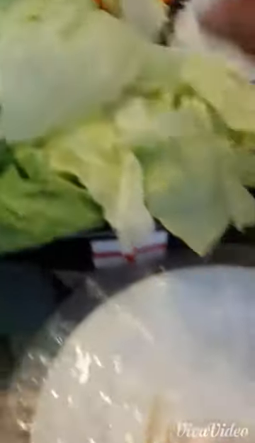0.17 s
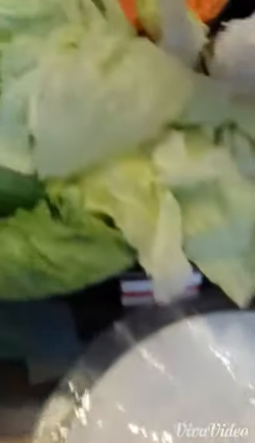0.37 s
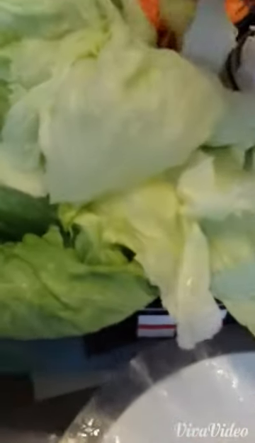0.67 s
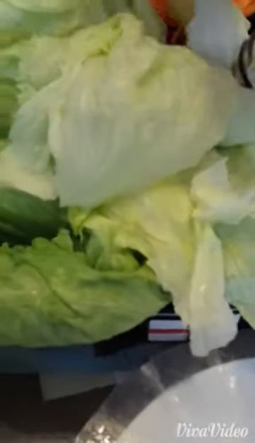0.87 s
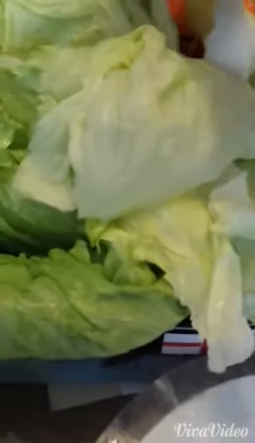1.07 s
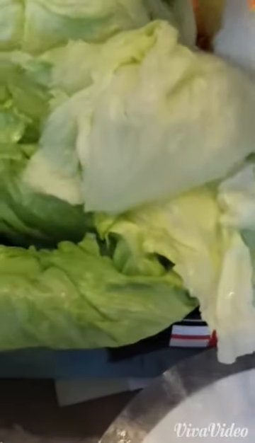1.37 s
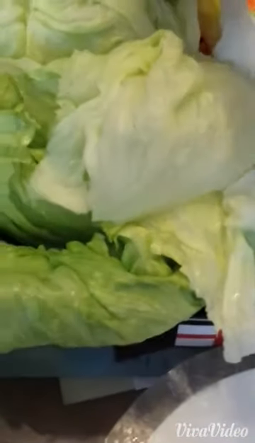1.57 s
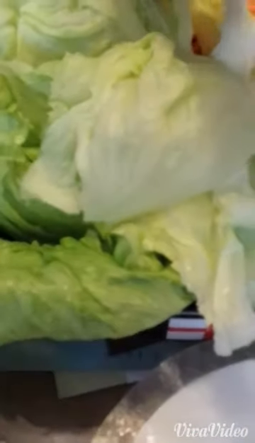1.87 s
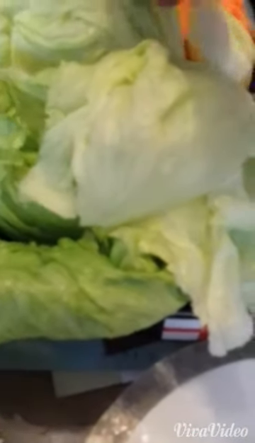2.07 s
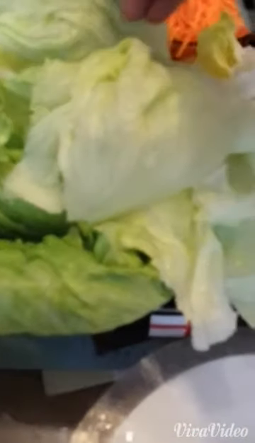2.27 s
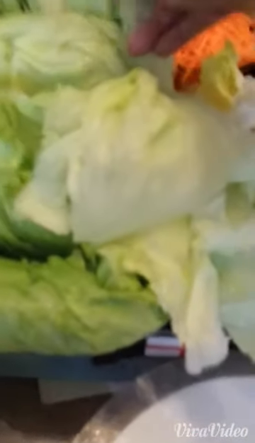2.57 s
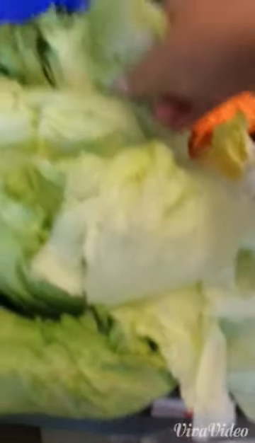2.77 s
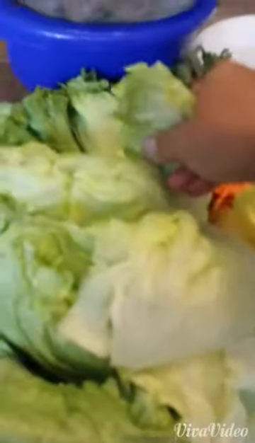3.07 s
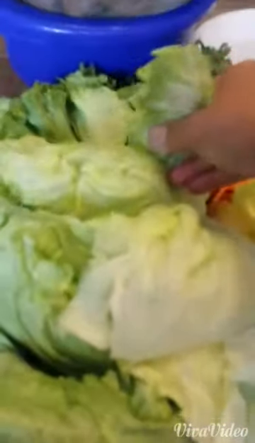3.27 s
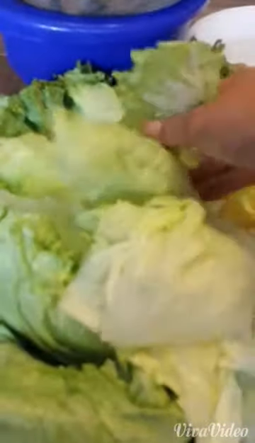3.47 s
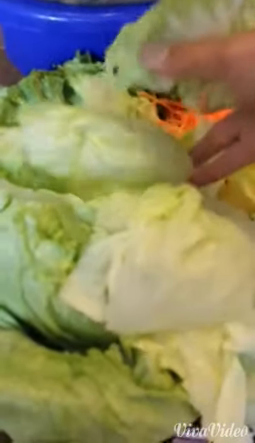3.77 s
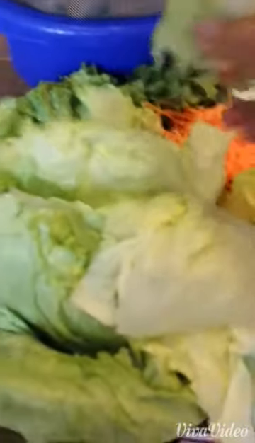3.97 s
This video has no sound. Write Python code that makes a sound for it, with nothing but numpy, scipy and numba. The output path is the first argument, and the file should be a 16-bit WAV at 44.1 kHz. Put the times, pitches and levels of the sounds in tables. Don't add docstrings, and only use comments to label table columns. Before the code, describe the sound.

Close, stereo crackle of lettuce being torn: quiet rustling builds into sharp rib snaps and one heavy crunch, then dies away.

```python
import sys
import numpy as np
from scipy import signal
from scipy.fft import rfft, irfft
from scipy.io import wavfile
from scipy.ndimage import uniform_filter1d
from numba import njit

SR = 44100
rng = np.random.default_rng(int(sys.argv[2]) if len(sys.argv) > 2 else 0)


def volts_from_decibels(level):
    exponent = np.asarray(level, float) / 20
    return 10 ** exponent


def inscribe(sig):
    pcm = np.round(np.clip(np.atleast_2d(sig).T, -1, 1) * 32767)
    wavfile.write(sys.argv[1], SR, pcm.astype(np.int16))


N = 182088


def unit(x):
    return x / np.sqrt(np.mean(x ** 2))


def follow(start_s, values):
    return np.interp(np.arange(N) / SR, start_s, values)


def event_columns(table):
    return np.transpose(table)[:, :, None]


def colour(x, points):
    hz, db = np.transpose(points)
    bins = np.arange(N // 2 + 1) * SR / N + 1
    curve_db = np.interp(np.log(bins), np.log(hz), db)
    return irfft(rfft(x) * volts_from_decibels(curve_db), N)


def pair(points, alike_hz):
    mid, left, right = rng.standard_normal((3, N))
    bins = np.arange(N // 2 + 1) * SR / N
    alike = .92 / (1 + (bins / alike_hz) ** 4)
    shared = np.sqrt(alike) * rfft(mid)
    apart = np.sqrt(1 - alike) * rfft(np.array([left, right]))
    return unit(colour(irfft(shared + apart, N), points))


def gesture(start_s, peak_db, swell_s, fade_s, rest_db):
    t = np.arange(0, N + 64, 64)[:, None] / SR
    before = (start_s - t) / np.maximum(swell_s, .01)
    after = (t - start_s) / np.maximum(fade_s, .01)
    db = peak_db - 20 * np.where(t < start_s, before, after)
    power = np.sum(volts_from_decibels(db) ** 2, axis=1) + volts_from_decibels(rest_db) ** 2
    return follow(t[:, 0], 10 * np.log10(power))


@njit
def rings(start, hz, cycles, size, rise):
    out = np.zeros(N)
    for k in range(len(start)):
        turn = np.exp((2j * np.pi - 1 / cycles[k]) * hz[k] / SR)
        soften = np.exp(-hz[k] / (rise * SR))
        z, soft, first = size[k] + 0j, 1., start[k]
        for j in range(first, min(N, first + int(6 * cycles[k] * SR / hz[k]))):
            out[j] += z.imag * (1 - soft)
            z *= turn
            soft *= soften
    return out


# start_s [s], lag_share [share of port lag, 0-1.5]
HAND_BEARING = [
    (.7, 1.14),
    (2.2, .9),
    (2.8, .55),
    (4.13, 0.49),
]


def heard(s, hz, cycles, db, pan_db, lag_s, detune, rise=0.34):
    spread = np.broadcast_arrays(s, hz, cycles, db, pan_db, lag_s, detune)
    s, hz, cycles, db, pan_db, lag_s, detune = map(np.ravel, spread)
    lag_s = lag_s * np.interp(s, *np.transpose(HAND_BEARING))
    cycles, rise = np.maximum(cycles, .3), max(1. * rise, .05)

    def at(t):
        return np.clip(t * SR, 0, N - 1).astype(np.int64)

    left_hz, right_hz = np.clip(hz * detune, 60, .3 * SR), np.clip(hz, 60, .3 * SR)
    left = rings(at(s + lag_s), left_hz, cycles, volts_from_decibels(db + pan_db / 2), rise)
    right = rings(at(s), right_hz, cycles, volts_from_decibels(db - pan_db / 2), rise)
    return np.array([left, right])


# pitch_hz [Hz], level_db [dB per Hz]
AIR_SPECTRUM = [(15, -29), (27, -10), (41, 8), (55, -14), (99, -26), (1120, -21), (1570, -22), (8460, -23),
                (10700, -13.5), (12200, -18), (15800, -54), (22000, -120)]


def air():
    return volts_from_decibels(-75.0) * pair(AIR_SPECTRUM, 730.0)


# start_s [s], rumble_db [dB]
GRIP_RUMBLE = [
    (0.0, -70),
    (0.54, -69),
    (0.62, -66),
    (0.78, -60),
    (0.87, -73),
    (3.72, -66),
    (4.13, -67),
]


def grip():
    tremor = pair([(28, -24), (42, -10.0), (70, -17.5), (140, -57.0)], 200.)
    return volts_from_decibels(follow(*np.transpose(GRIP_RUMBLE)) + 4.0) * tremor


def kitchen(x):
    t60_s, onset_s, level_db = 0.11, 0.00072, -8
    t = np.arange(SR // 2) / SR
    tail = rng.standard_normal((2, len(t))) * volts_from_decibels(-60 * t / t60_s) * (1 - np.exp(-t / onset_s))
    tail = tail / np.sqrt(np.sum(tail ** 2, axis=1, keepdims=True))
    return volts_from_decibels(level_db) * signal.fftconvolve(x, tail, axes=1)[:, :N]


# pitch_hz [Hz], level_db [dB per Hz]
TABLE_SPECTRUM = [(41, -59), (70, 2), (170, -3.5), (275, 3), (363, -1), (402, -1), (530, -1), (774, -7.5),
                  (1000, -14.5), (1300, -24), (2200, -120)]


def table_rumble(rumble_db):
    jolts = volts_from_decibels(1.6 * unit(uniform_filter1d(rng.standard_normal(N), size=900)))
    return volts_from_decibels(rumble_db + 2.5) * unit(jolts * pair(TABLE_SPECTRUM, 670.0))


def flesh_rub(rub_db):
    return volts_from_decibels(rub_db - 2.0) * crinkle(np.full(N, 1709.0), 0.553, 2.2, 1.8, -2.5, count=12000)


# start_s [s], rumble_db [dB], rub_db [dB], fade_s [s per 20 dB]
HEAP_PRESSES = [(0.0, -57.5, -58, 0.23), (.2, -62, -65.5, 0.6), (.48, -60, -63.5, .5),
                (.62, -57, -70, 0.29), (.72, -61, -58.5, 0.16), (1.076, -62, -62.5, 0.12),
                (1.135, -60, -63, 0.08), (1.3, -61.5, -61, 0.3), (1.556, -64.5, -67.5, 0.33),
                (1.7, -61.5, -62.5, 0.23), (1.882, -59.5, -63.5, 0.23), (2.092, -55.5, -53, 0.12),
                (2.159, -55.5, -48, 0.1), (2.28, -56.5, -73, 0.55), (2.469, -56, -53.5, 0.13),
                (2.68, -53.5, -50.5, 0.05), (2.74, -57, -51, 0.15), (2.88, -61.5, -73, 1),
                (2.97, -65, -67, 0.65), (3.12, -61.5, -55.5, 0.3), (3.27, -61, -52, 0.2),
                (3.386, -43, -33.5, 0.0435), (3.448, -51.5, -49.5, 0.32), (3.62, -62, -57, 0.14),
                (3.7, -50, -48.5, 0.16), (3.78, -53, -53, 0.11), (3.88, -62, -64, .1), (3.97, -70, -76, .3),
                (4.05, -66, -65, .09), (4.11, -66, -64, 0.15)]


def presses():
    start_s, rumble_db, rub_db, fade_s = np.transpose(HEAP_PRESSES)
    swell_s = 0.69 * fade_s
    rumble_db = gesture(start_s, rumble_db, swell_s, fade_s, rest_db=-94)
    rub_db = gesture(start_s, rub_db, swell_s, fade_s, rest_db=-90)
    return table_rumble(rumble_db), flesh_rub(rub_db)


# start_s [s], peak_db [dB], pitch_hz [Hz]
TABLE_THUDS = [(0.137, -43, 395), (0.289, -58, 257), (0.481, -50, 454), (0.694, -44.5, 432),
               (0.744, -51, 271), (1.122, -56.5, 260), (1.483, -59, 455), (1.525, -58.5, 433),
               (1.559, -50, 440), (1.684, -52, 420), (1.858, -58, 417), (2.072, -53, 504), (2.13, -32, 558),
               (2.197, -45, 450), (2.426, -41.5, 420), (2.471, -44.5, 440), (2.659, -52, 620),
               (2.844, -52, 517), (3.17, -51, 400), (3.25, -47.5, 446), (3.384, -32.5, 427),
               (3.397, -37.5, 288), (3.699, -45.5, 250), (2.947, -47, 500), (3.05, -52, 480)]


def thuds():
    s, peak_db, hz = np.transpose(TABLE_THUDS)
    main_mode = heard(s, hz, 3.1, peak_db + 4.5, 0.5, 0.00016, 0.96, rise=0.27)
    return main_mode + heard(s, 0.75 * hz, 6.5, peak_db - 7.0, -0.36, -0.00014, 0.97, rise=0.2)


# start_s [s], peak_db [dB], pitch_hz [Hz]
TABLE_RINGS = [(2.289, -46, 420), (2.632, -54, 455), (2.668, -51, 457), (3.39, -37.5, 331),
               (3.405, -40.5, 428), (2.7215, -40.5, 453), (2.745, -52, 560), (2.779, -48, 432),
               (2.781, -51, 634), (2.698, -55, 645), (4.032, -60.5, 1250), (4.098, -62, 1860)]


def hums():
    s, peak_db, hz = np.transpose(TABLE_RINGS)
    return heard(s, hz, 4.8, peak_db + 6.5, 0.4, 0.0001, 0.99, rise=1.5)


# start_s [s], peak_db [dB], pitch_hz [Hz]
THIN_STALKS = [(1.448, -60, 1560), (2.108, -43, 1170), (2.44, -41, 1110), (2.465, -45, 1110),
               (2.499, -45.5, 1190), (2.677, -54, 825), (2.962, -43, 921), (3.016, -48, 1100),
               (3.221, -45, 1150), (3.34, -45, 1100), (3.408, -30, 1080), (3.557, -42, 1120),
               (3.646, -46, 1130), (3.69, -41, 1130), (3.7, -41.5, 1050)]


def plips():
    s, peak_db, hz = np.transpose(THIN_STALKS)
    return heard(s, hz, 2.04, peak_db + 1.5, -6.5, 0.0002, 1.04)


# start_s [s], peak_db [dB], pitch_hz [Hz]
STALK_KNOCKS = [(0.5985, -49, 3000), (0.6948, -47, 3250), (1.2566, -53, 3090), (1.4476, -52, 2620),
                (1.9973, -42.5, 2700), (2.0844, -43, 3140), (2.1635, -29, 3000), (2.2214, -25, 3170),
                (2.2464, -41, 2880), (2.3615, -36, 3330), (2.4392, -41, 3440), (2.4982, -48, 3490),
                (2.6844, -48, 1840), (2.9564, -32.5, 2130), (2.9614, -37, 3250), (3.1454, -46, 2030),
                (3.1542, -41.5, 2110), (3.1993, -41, 2270), (3.3784, -20.5, 3220), (3.5074, -45, 3300),
                (3.5897, -34.5, 2400), (3.7864, -47, 2270), (4.0806, -55, 1860)]


def knocks():
    s, peak_db, hz = np.transpose(STALK_KNOCKS)
    return heard(s, hz, 2.5, peak_db + 5.0, -6.0, 0.00018, 0.84)


# start_s [s], peak_db [dB], pitch_hz [Hz]
THICK_STALKS = [(1.128, -57, 1000), (1.692, -48, 1060), (2.103, -46, 1330), (2.128, -34, 1120),
                (2.222, -38.5, 977), (2.315, -41.5, 1130), (2.363, -42, 1000), (2.429, -37.5, 1040),
                (2.66, -49, 800), (2.732, -37, 1115), (2.848, -41.5, 960), (2.881, -43.5, 1020),
                (2.947, -33, 1104), (3, -39, 1210), (3.06, -37, 1254), (3.185, -44, 1020),
                (3.209, -35, 2170), (3.236, -41, 1010), (3.293, -45, 1180), (3.314, -38.5, 1230),
                (3.36, -36, 2140), (3.381, -24, 1088), (3.59, -40, 915), (3.669, -41.5, 1150),
                (3.682, -38, 1080), (3.79, -42.5, 1370)]


def pops(count=4):
    s, peak_db, hz = event_columns(THICK_STALKS)
    chance = rng.standard_normal((len(s), count))
    hollow = heard(s, hz, 2.26, peak_db + 4.0, -6.5, 0.00019, 1.0)
    later_s = 0.00185 * rng.random((len(s), count))
    click_hz = 1.608 * hz * np.exp(0.434 * chance)
    return hollow + heard(s + later_s, click_hz, 2.46, peak_db - 0.5, -3.5, 0.00034, 0.877)


# pitch_hz [Hz], level_db [dB per Hz]
SLIDE_SPECTRUM = [(2300, -30), (2900, -1.5), (3500, -23), (4500, -16), (5200, 4), (5600, -17), (6050, -7),
                  (6700, -20), (7700, -12), (9500, -17)]


def slide():
    slide_db = gesture(0.596, -51, swell_s=0.12, fade_s=0.12, rest_db=-100)
    return volts_from_decibels(slide_db) * pair(SLIDE_SPECTRUM, 730.0)


def crinkle(centre_hz, spread, cycles, scatter_db, pan_db, count):
    s = rng.random(count) * N / SR
    chance = rng.standard_normal((4, count))
    hz = centre_hz[(s * SR).astype(int)] * np.exp(spread * chance[0])
    db = scatter_db * np.minimum(rng.exponential(size=count), 4)
    lag_s = 0.00033 + 0.6e-4 * chance[1]
    detune = np.exp(0.16 * chance[3])
    return unit(heard(s, hz, cycles, db, pan_db + 9.5 * chance[2], lag_s, detune))


# start_s [s], crinkle_db [dB], swell_s [s per 20 dB], fade_s [s per 20 dB]
LEAF_SQUEEZES = [(0.0, -65.5, .1, 0.5), (.35, -61.5, 0.6, 0.72), (.6, -50.5, 0.11, 0.13),
                 (.72, -60, 0.33, 0.09), (1.06, -66, 0.04, .5), (1.33, -63.5, 0.18, 0.24),
                 (1.558, -57, 0.06, 0), (1.598, -62, 0.05, 0.03), (1.701, -51, 0.05, 0.07),
                 (1.77, -67.5, 0.3, 0.3), (1.87, -61.5, 0.02, 0.5), (1.925, -55, 0.03, .04),
                 (2.156, -38.5, 0.09, 0.09), (2.301, -39.5, 0.21, 0.22), (2.52, -55.5, -0.05, .4),
                 (2.73, -50, 0.05, .4), (2.889, -43, 0.05, 0.09), (2.968, -40.5, 0, 0.17),
                 (3.03, -48.5, 0.04, 0.07), (3.16, -48.5, -0.07, 0.24), (3.27, -47, 0.11, 0.3),
                 (3.369, -28, 0.0153, 0.0332), (3.384, -25.5, 0.0158, 0.1124), (3.448, -43, -0.4, 0.2655),
                 (3.565, -43, -0.07, 0.11), (3.616, -39, 0.05, 0.06), (3.696, -37.5, 0, 0.11),
                 (3.79, -47.5, -0.3, 0.11), (3.93, -71, .1, .3), (4.13, -56.5, 0.1, 0.5)]
# start_s [s], centre_hz [Hz], taut_db [dB]
LEAF_SKIN = [
    (0.0, 6000, -4.5),
    (.45, 5300, -9.5),
    (.56, 5540, 0.5),
    (.68, 5140, 2.5),
    (.8, 6300, -2.5),
    (2.7, 6120, -3),
    (2.92, 6900, -5),
    (3.1, 6170, -5.5),
    (4.13, 6400, -3.5),
]


def skins():
    crisp_db = gesture(*np.transpose(LEAF_SQUEEZES), rest_db=-81.5)
    start_s, centre_hz, taut_db = np.transpose(LEAF_SKIN)
    centre_hz, taut_db = follow(start_s, centre_hz), follow(start_s, taut_db)
    dry_grains = volts_from_decibels(crisp_db - 1.0) * crinkle(centre_hz, 0.34, 0.49, 2.74, -0.33, count=24000)
    taut = volts_from_decibels(crisp_db + taut_db) * crinkle(centre_hz, .12, 3, 2.5, -3, count=12000)
    buckles = volts_from_decibels(crisp_db - 10.0) * crinkle(centre_hz, 0.207, 4.5, 2.2, -2.2, count=1200)
    return dry_grains + taut + buckles


def snaps(s, peak_db, leaf_hz, pan_db, ms, count=16):
    chance = rng.standard_normal((4, len(s), count))
    clear = count // 4
    chance[:, :, clear] = 0
    ms = np.abs(ms) + 0 * s
    later = (np.arange(count) + rng.random((len(s), count))) / count
    shape_db = -22.0 * later - 22 * np.exp(-(later / 0.16) ** 2)
    db = peak_db + 0.78 + 11.2 * np.log10(ms / 2 + 0.28) + shape_db + 2.5 * chance[0]
    db[:, clear] += 6.8 * np.minimum(2.7 / ms[:, 0], 1)
    lag_s = 2.2e-4 + 0.00016 * chance[1, :, :1] + .4e-4 * chance[2]
    hz = leaf_hz * np.exp(0.23 * chance[3] - .01)
    crack_s = s + (2.1 * later - .53) * ms / 1000
    return heard(crack_s, hz, 1.7, db, pan_db, lag_s, np.exp(0.044 * chance[2]))


# start_s [s], peak_db [dB], leaf_hz [Hz]
CREASE_TICKS = [(1.111, -47.5, 7050), (1.2174, -46.5, 6300), (1.662, -49, 6990), (1.692, -31.5, 6600),
                (1.8606, -47, 7500), (2.0095, -47.5, 6500), (2.0492, -41, 6920), (2.0538, -42, 6550),
                (2.135, -35, 6800), (2.2053, -33, 6320), (2.2936, -29, 5520), (2.5532, -37, 5430),
                (2.604, -35, 6060), (2.6251, -49, 6370), (2.6565, -39, 6620), (2.723, -35, 5070),
                (2.766, -38, 6050), (2.781, -35, 7130), (2.825, -26, 6310), (2.834, -28.5, 5670),
                (2.8926, -26, 6840), (2.947, -20, 6820), (2.988, -28, 6500), (3.023, -31, 6790),
                (3.1154, -37.5, 6050), (3.2005, -39, 5510), (3.222, -36, 6500), (3.263, -33, 6250),
                (3.28, -35, 7660), (3.368, -24, 6400), (3.37, -18, 6500), (3.3952, -8.5, 6330),
                (3.4002, -16, 6540), (3.4036, -13, 7000), (3.418, -21, 6000), (3.423, -18.5, 6160),
                (3.4357, -26, 6470), (3.4514, -27, 6200), (3.5522, -26, 6990), (3.5815, -25.5, 6450),
                (3.5997, -33, 5580), (3.606, -25, 6300), (3.66, -29, 6070), (3.675, -32, 6350),
                (3.709, -33, 6950), (3.7234, -42, 6930), (3.7445, -32.5, 6100), (3.7945, -37, 5780),
                (3.856, -39, 6940), (3.8965, -44, 6800)]


def ticks():
    return snaps(*event_columns(CREASE_TICKS), pan_db=-6.5, ms=1.8)


# start_s [s], peak_db [dB], leaf_hz [Hz]
UNFOLDED_CREASES = [(.568, -41, 5300), (.577, -39, 5900), (0.585, -38, 5200), (.598, -39, 5200),
                    (0.609, -39, 6000), (0.637, -34.5, 5200), (.7064, -53, 6200), (1.9397, -42, 5500),
                    (2.004, -39, 6500), (2.040, -45, 6500), (2.0858, -44, 5500), (2.1217, -18, 6100),
                    (2.1478, -19, 6560), (2.151, -15, 8100), (2.7138, -43, 6200), (3.0627, -39, 6200),
                    (3.1468, -37, 6400), (3.157, -37, 6400), (3.162, -40, 6400), (3.234, -30, 6200),
                    (3.2682, -23.5, 7050), (3.354, -34, 6400), (3.3732, -19, 5570), (3.3854, -8, 7200),
                    (3.5767, -28, 6400), (3.6376, -41, 6400), (3.7062, -25, 6500), (3.715, -30, 6500),
                    (3.7504, -28, 6500), (3.774, -35, 6500), (3.786, -39, 6500), (3.835, -39, 7000),
                    (4.12, -45, 6500)]


def creases():
    return snaps(*event_columns(UNFOLDED_CREASES), pan_db=-9.5, ms=1.4)


# start_s [s], peak_db [dB], leaf_hz [Hz]
THIN_VEINS = [(1.047, -46, 6850), (1.09, -46, 6000), (1.2572, -46, 3550), (1.448, -46, 5600),
              (1.6026, -45.5, 7000), (1.9626, -40, 6700), (2.0268, -40, 6940), (1.5608, -40.5, 6400),
              (1.6747, -38.5, 6950), (1.6805, -38, 6670), (1.8924, -37, 8500), (1.9255, -32.5, 7160),
              (1.934, -35, 6640), (2.07, -34, 6700), (2.258, -25, 6950), (2.6865, -33.5, 6650),
              (2.7875, -28.5, 6900), (2.9622, -27, 5800), (3.0004, -29.5, 4500), (3.049, -38, 5030),
              (3.137, -29, 6500), (3.1693, -32.5, 6450), (3.1873, -30.5, 6900), (3.236, -27, 6200),
              (3.4098, -15, 5900), (3.482, -33, 6100), (3.611, -38, 6200), (3.656, -29, 5900),
              (3.325, -32, 6700)]


def veins():
    return snaps(*event_columns(THIN_VEINS), pan_db=-9, ms=2.4)


# start_s [s], peak_db [dB], leaf_hz [Hz], burst_ms [ms]
SLOW_TEARS = [(1.6843, -27, 6450, 3), (1.9196, -35, 7300, 2.5), (2.099, -24, 7300, 2.46),
              (2.12, -20, 6800, 1.35), (2.145, -33, 7400, 4), (2.1637, -24, 4600, 2.9),
              (2.2218, -14.5, 6160, 4.5), (2.2348, -23.5, 6160, 6), (2.25, -24, 7600, 2.5),
              (2.2781, -12.5, 5500, 2.2), (2.328, -20, 5170, 2.4), (2.4293, -24.5, 4270, 4.15),
              (2.455, -27, 4900, 3.5), (2.733, -27, 5730, 3.1), (2.8466, -18, 6900, 2.9),
              (2.8722, -22.5, 7160, 3.6), (2.9031, -31, 6300, 3.5), (2.956, -13.5, 6500, 2.5),
              (3.0107, -20, 5940, 1.98), (3.2435, -15, 7000, 2.1), (3.2694, -19, 8300, 1.95),
              (3.812, -34, 6300, 1.3), (3.3896, -14, 6700, 3), (3.518, -27, 6450, 4.2),
              (0.692, -37, 4930, 6.4), (3.6667, -26, 6470, 4), (3.684, -15.5, 6760, 3.3),
              (3.691, -16, 5370, 3.1), (3.6982, -18.5, 6800, 3.7)]


def tears():
    s, peak_db, leaf_hz, burst_ms = event_columns(SLOW_TEARS)
    return snaps(s, peak_db, leaf_hz, -7.5, burst_ms)


# [left minus right, dB]
QUICK_RIBS = [(1.9007, -36, 6960, -13), (1.689, -24, 6700, -3), (1.997, -32.5, 6640, -18.5),
              (2.076, -35, 7400, -12), (2.095, -23, 7200, -14.5), (2.127, -19, 5860, 4),
              (2.1573, -20, 5950, -11), (2.2986, -19, 7900, -10), (2.3035, -14, 6400, -3),
              (2.3148, -11, 6500, -14.5), (2.319, -21, 6740, 4), (2.3382, -13.5, 5470, -1),
              (2.362, -23, 6650, -13), (2.4396, -21.5, 7650, -9.5), (2.4996, -20.5, 7840, -3),
              (2.5364, -22.5, 6270, 2), (2.718, -20.5, 6000, -4), (2.7956, -21.5, 6900, -7),
              (2.831, -23, 7600, -5.5), (2.887, -17, 5640, -6), (2.952, -6, 7600, -3),
              (3.126, -36, 6140, -16), (3.2102, -22.5, 7300, -5), (3.294, -19.5, 7800, -6),
              (3.316, -21.5, 6000, -4), (3.3594, -13, 6640, -7), (3.382, -12, 6740, -12),
              (3.555, -19.5, 6740, -8), (3.5907, -18, 5900, -2), (3.3749, -5, 6500, -4.5)]


def ribs():
    return snaps(*event_columns(QUICK_RIBS), ms=1.25)


def scene():
    table, flesh = presses()
    bright = skins() + flesh + slide() + ticks() + creases() + veins() + tears() + ribs()
    dull = thuds() + hums() + plips() + knocks() + pops()
    return air() + grip() + kitchen(bright + dull) + table + dull + bright


# pitch_hz [Hz], level_db [dB]
LEFT_COLOUR = [(25, -17.5), (60, -8), (120, -7.5), (750, -2.5), (1100, 1), (3000, -2), (4600, 0.5),
               (6500, 4), (9000, -3), (11000, -1), (12000, -18), (12700, -55.5)]
# pitch_hz [Hz], level_db [dB]
RIGHT_COLOUR = [(25, -16.5), (60, -9), (120, -3), (750, -3.5), (1100, 0.5), (3000, 1.5), (4600, -2),
                (6500, 2.5), (9000, 4.5), (11000, 4.5), (12000, -11), (12700, -45)]


def ports(dry):
    return np.array([colour(dry[0], LEFT_COLOUR), colour(dry[1], RIGHT_COLOUR)])


# pitch_hz [Hz], empty_share [0-1]
EMPTY_BANDS = [(9300, 0.42), (9800, 0.4), (10700, 0.47), (11500, 0.51), (12200, 0.8)]
# start_s [s], length_s [s], from_hz [Hz], to_hz [Hz]
BAND_GAPS = [
    (.62, .034, 3250, 3700),
    (.6, .04, 3750, 4100),
    (2.934, .01, 2600, 3500),
    (3.565, .028, 2750, 3100),
    (3.392, .04, 11500, 13000),
    (3.432, .07, 10750, 13000),
    (3.325, .022, 9500, 13000),
    (3.585, .06, 11300, 13000),
]


def starve(x, band=8, hold=4):
    hz, t, frames = signal.stft(x, SR, nperseg=768, noverlap=576)
    dice = rng.random((2, len(hz) // band + 1, len(t) // hold + 1))
    dice = dice.repeat(band, 1).repeat(hold, 2)
    dice = .55 * dice + .45 * uniform_filter1d(dice[:, :1], size=9)
    power = np.sum(np.abs(frames) ** 2, axis=1, keepdims=True) + 1e-18
    calm = np.clip(uniform_filter1d(power, size=25) / power, 0, 2.5) ** 0.46
    empty_share = np.interp(hz, *np.transpose(EMPTY_BANDS), left=.002)[:, None]
    kept = dice[:, :len(hz), :len(t)] >= calm * empty_share
    for start_s, length_s, from_hz, to_hz in BAND_GAPS:
        in_band = (hz[:, None] > from_hz) & (hz[:, None] < to_hz)
        kept[:, in_band & (t >= start_s) & (t <= start_s + length_s)] = False
    return signal.istft(frames * (kept + .002), SR, nperseg=768, noverlap=576)[1][:, :N]


def roll_off(x):
    return signal.sosfilt(signal.butter(12, 12300, fs=SR, output="sos"), x)


def record(dry):
    mix = starve(ports(dry))
    return roll_off(mix)


dry = scene()
out = record(dry)
inscribe(out)
```